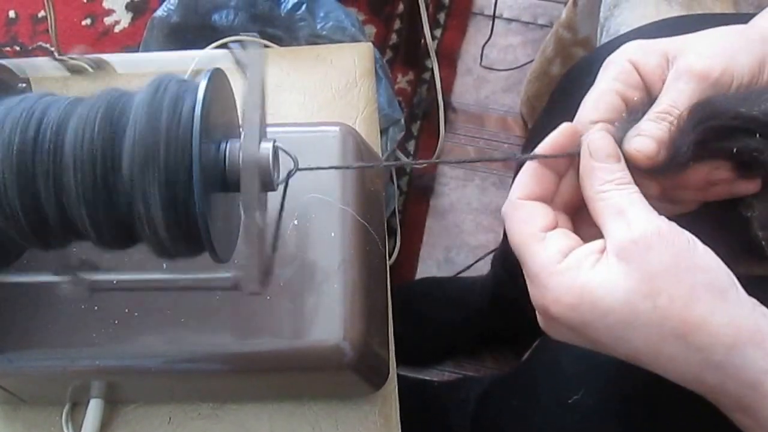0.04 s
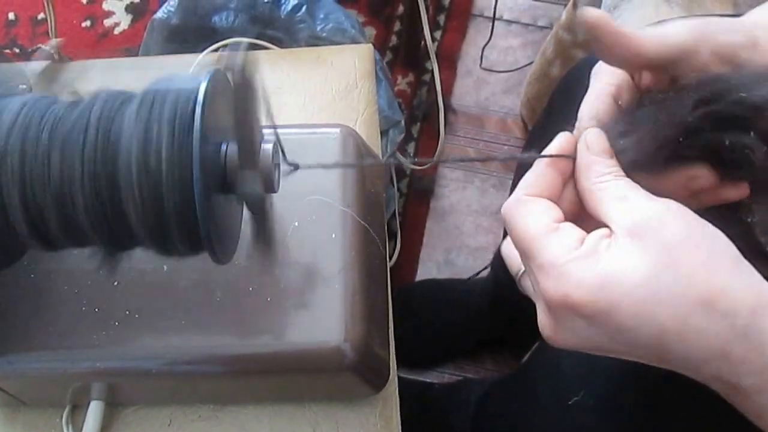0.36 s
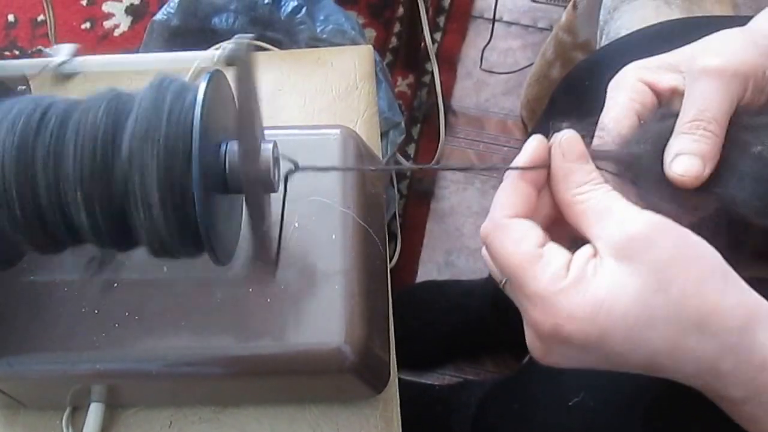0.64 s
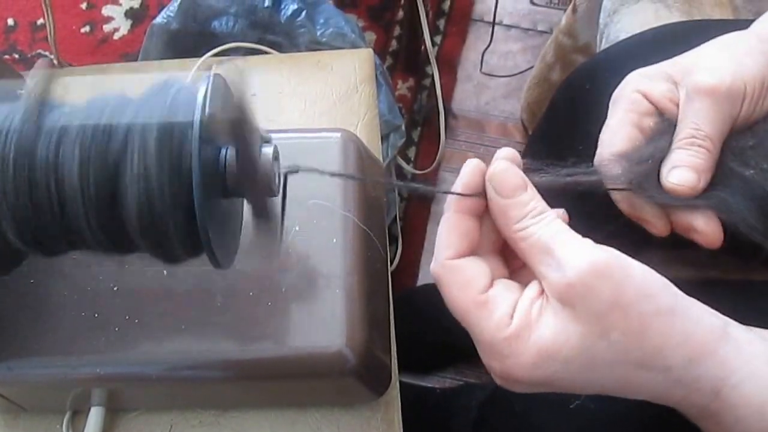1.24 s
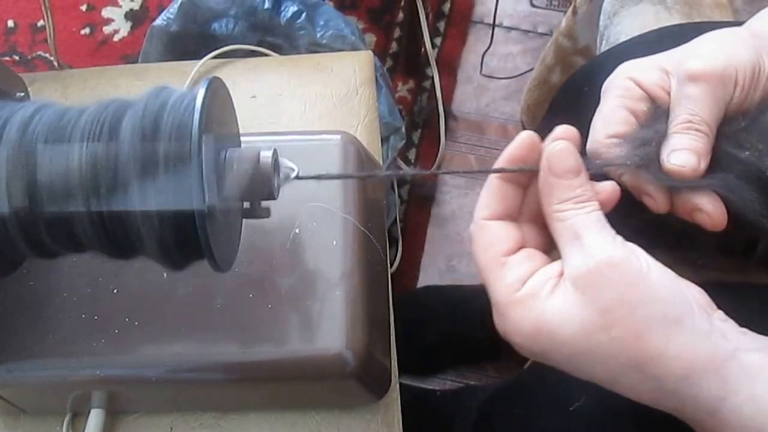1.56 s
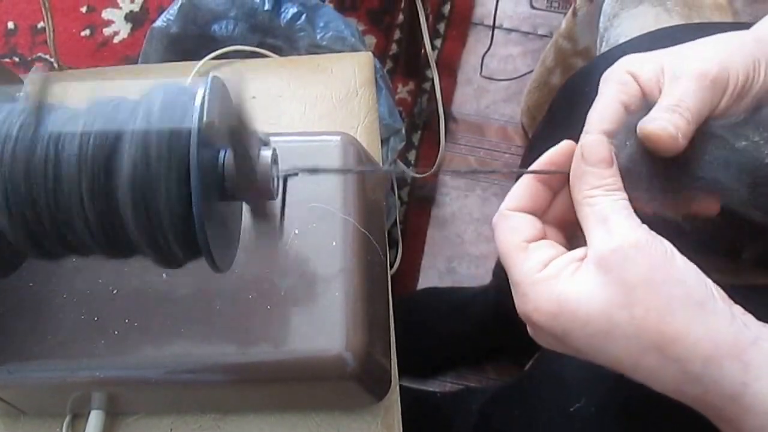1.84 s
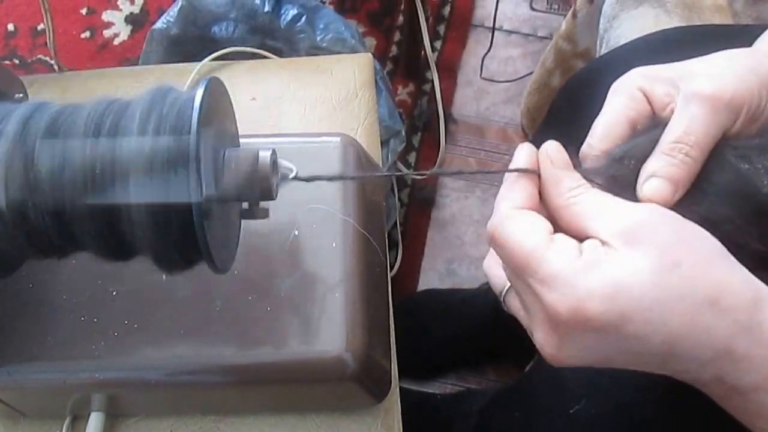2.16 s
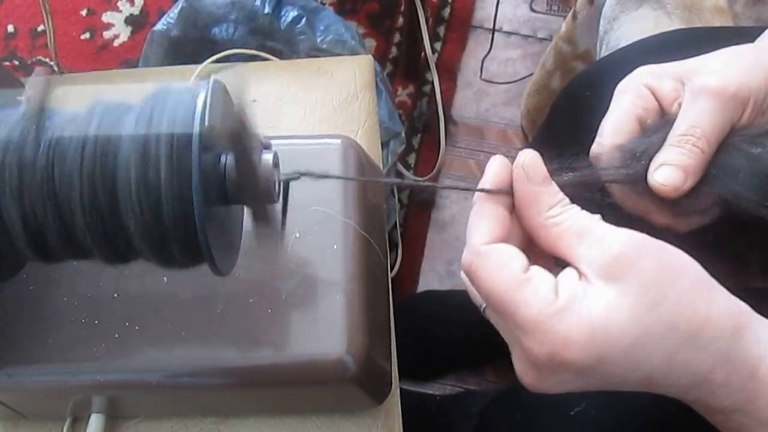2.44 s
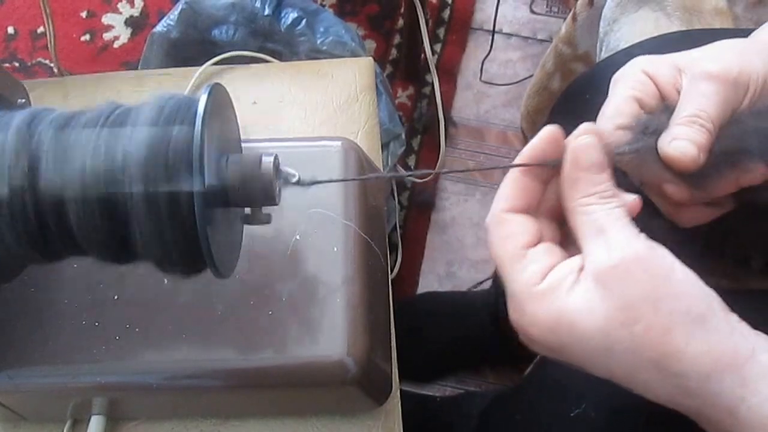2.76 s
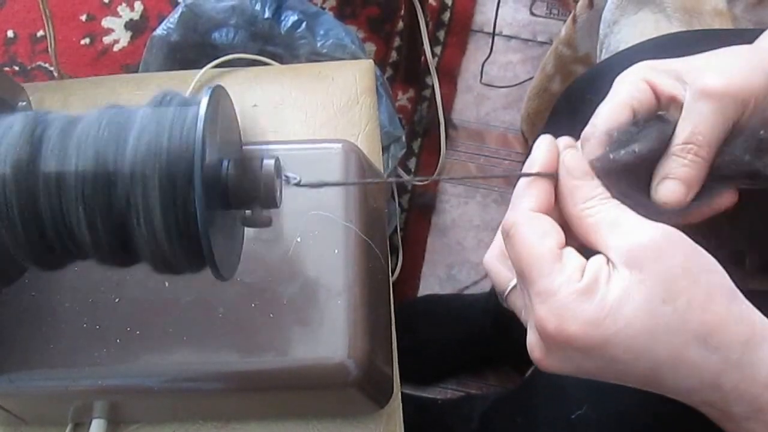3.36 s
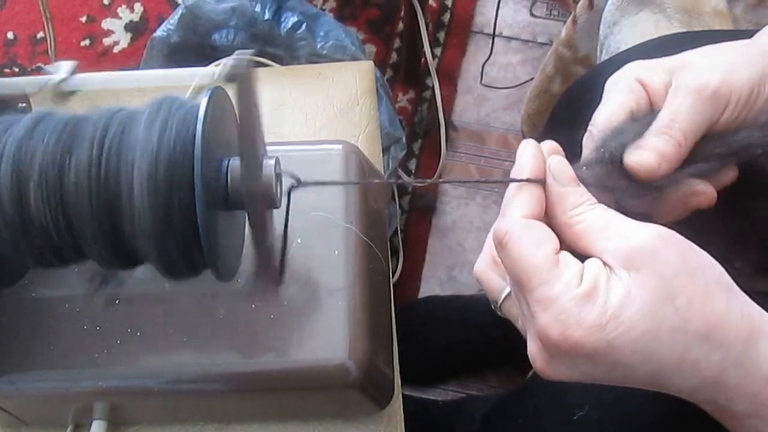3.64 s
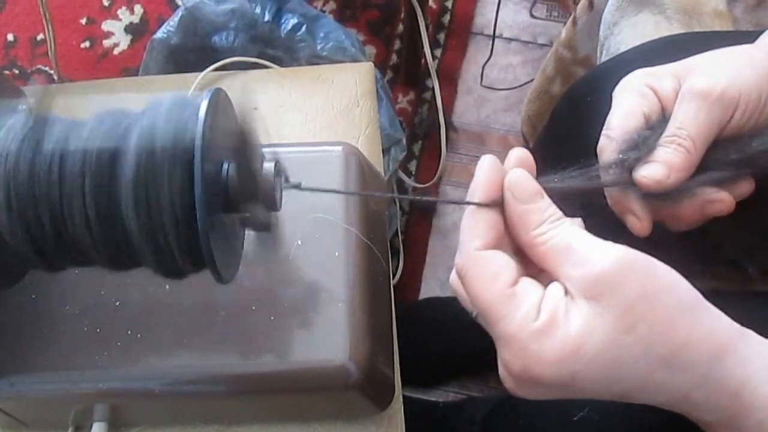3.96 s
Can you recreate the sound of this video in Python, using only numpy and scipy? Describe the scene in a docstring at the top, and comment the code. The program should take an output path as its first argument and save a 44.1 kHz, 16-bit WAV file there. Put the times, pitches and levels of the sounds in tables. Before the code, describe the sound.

An electric spinning wheel buzzes steadily with a fast throb and a fine metallic rattle. A few sharp ticks and soft bumps come early, then its belt scuffs in a light rhythm, heard close in a carpeted room.

```python
"""In a carpeted room, an electric spinning wheel runs on a table close by.
Its motor hums and knocks the casing once per cycle of the mains power, so the casing buzzes and the
metal parts rattle. The flyer (the spinning arms that twist the yarn) is off balance and presses harder
once per turn, so the buzz throbs. The belt's seam scuffs in runs of about five a second, sometimes
with a sharp tick. The frame bumps softly, and the yarn snaps once as it is drawn out."""
import sys
import numpy as np
from scipy import signal
from scipy.fft import rfft, irfft
from scipy.io import wavfile

SR = 44100
rng = np.random.default_rng(int(sys.argv[2]) if len(sys.argv) > 2 else 0)


def to_wav(sig):
    """Store sig (one row per channel, or 1-D mono) as 16-bit WAV at the path in sys.argv[1].

    Samples outside -1..1 are clipped; the rate is SR.
    """
    pcm = np.clip(np.atleast_2d(sig), -1, 1) * 32767
    pcm = np.round(pcm).astype(np.int16)
    wavfile.write(sys.argv[1], SR, pcm.T)  # frames by channels


N = 176400


def amp(db):
    """Turns decibels into a number to multiply a sound by."""
    return 10 ** (np.asarray(db) / 20)


def unit(x):
    """Scales a signal to an average (rms) level of 1."""
    return x / np.sqrt(np.mean(x ** 2) + 1e-20)


def add(mix, start_s, sound):
    """Mixes a sound in at the given time."""
    part = mix[max(round(start_s * SR), 0):][:len(sound)]
    part += sound[:len(part)]


def highpass(hz, order):
    """A filter that weakens everything below hz."""
    return signal.butter(order, hz, "high", fs=SR, output="sos")


def noise(points):
    """Noise whose tone follows a curve of (frequency [Hz], relative level [dB]) points."""
    point_hz, point_db = np.transpose(points)
    hz = np.fft.rfftfreq(N, 1 / SR)
    curve_db = np.interp(np.log(hz + 1), np.log(point_hz), point_db)
    return unit(irfft(rfft(rng.standard_normal(N)) * amp(curve_db), N))


def clicks(times, sizes):
    """One tiny click at each time, shared between the two nearest samples."""
    out = np.zeros(N)
    at = times * SR
    whole = np.floor(at).astype(int)
    out[whole % N] += sizes * (1 - at + whole)
    out[(whole + 1) % N] += sizes * (at - whole)
    return out


def bursts(times, force_db, rise_s, decay_s):
    """A loudness curve that swells at each knock and dies away."""
    t = np.arange(SR // 10) / SR
    shape = (1 - np.exp(-t / rise_s)) * np.exp(-t / decay_s)
    return unit(signal.fftconvolve(clicks(times, amp(force_db)), shape)[:N])


def struck_tone(times, sizes, hz, width):
    """A tone that rings after each strike; the greater its width in Hz, the sooner it fades."""
    t = np.arange(SR // 4) / SR
    ring = np.exp(-np.pi * width * t) * np.sin(2 * np.pi * hz * t)
    return signal.fftconvolve(clicks(times, sizes), ring)[:N]


def room_echo(sound, level_db=-22, fade_s=.25):
    """The short, weak echo of a carpeted room, falling 60 dB in fade_s."""
    t = np.arange(SR // 2) / SR
    tail = rng.standard_normal(len(t)) * np.exp(-np.log(1000) * t / fade_s) * (t > .005)
    return amp(level_db) * signal.fftconvolve(sound, tail / np.linalg.norm(tail))[:N]


def motor(whir_db=-43):
    """The motor hums steadily over the whir of bearings and air."""
    # tones of the hum and a faint whine: (frequency [Hz], rms level [dB])
    hum_tones = [(50, -59.5), (100, -69), (150, -65), (250, -57), (300, -58), (7881, -81), (13717, -86)]
    # tone of the whir: (frequency [Hz], relative level [dB])
    whir_curve = [(25, -11), (70, -8), (150, -4.5), (280, -4), (500, -1), (1400, -1), (1900, -9),
                  (2700, -10), (3300, -9), (3650, -2), (4000, -12), (4900, -20.5), (5500, -18), (5800, -23),
                  (6250, -17), (7100, -28), (8500, -30), (10500, -36), (15500, -40.5)]
    t = np.arange(N) / SR
    hum = sum(amp(db) * np.sqrt(2) * np.sin(2 * np.pi * (hz * t + rng.random())) for hz, db in hum_tones)
    return hum + amp(whir_db) * noise(whir_curve)


def frame_bumps(decay_s=.006):
    """Each soft bump of the frame is a low tone that dies almost at once."""
    # bumps: (time [s], frequency [Hz], level [dB])
    bumps = [(.835, 290, -35), (.982, 45, -35), (.986, 100, -38), (.986, 170, -37), (1.048, 285, -37),
             (3.17, 260, -42)]
    t = np.arange(SR // 10) / SR
    shape = 2 * t / decay_s * np.exp(-t / decay_s)
    out = np.zeros(N)
    for start_s, hz, db in bumps:
        add(out, start_s, amp(db) * shape * np.sin(2 * np.pi * hz * t))
    return out


def sharp_ticks(decay_s=.0009):
    """A few sharp ticks, mostly the belt's seam passing, plus one louder snap of the yarn."""
    # ticks: (time [s], level [dB])
    ticks = [(.2154, -30), (.9872, -24), (1.3815, -28), (1.579, -28), (3.5937, -34)]
    # tone of a tick: (frequency [Hz], relative level [dB])
    tick_curve = [(100, -8), (1000, 0), (2200, 0), (4500, -4), (6300, -11), (8000, -25), (11000, -32),
                  (16000, -46)]
    t = np.arange(SR // 10) / SR
    shape = t / decay_s * np.exp(1 - t / decay_s)
    loudness = np.zeros(N)
    for start_s, db in ticks:
        add(loudness, start_s, amp(db) * shape)
    return loudness * noise(tick_curve)


def belt_scuffs(length_s=.022):
    """The drive belt's seam rubs as it passes, making short puffs of noise."""
    # scuffs: (time [s], level [dB])
    scuffs = [(.209, -29), (.42, -41), (1.378, -38), (1.578, -32), (1.772, -34), (1.972, -33), (2.36, -41),
              (2.582, -33), (2.78, -37), (2.968, -34), (3.165, -35), (3.37, -40), (3.59, -37), (3.765, -38)]
    # tone of a scuff: (frequency [Hz], relative level [dB])
    scuff_curve = [(100, -25), (700, -8), (1500, 0), (1900, -2), (2600, -9), (3600, -9), (5000, -22),
                   (7000, -32), (12000, -58)]
    t = np.arange(SR // 10) / SR
    shape = np.sin(np.pi * np.minimum(t / length_s, 1) ** .5) ** 2
    loudness = np.zeros(N)
    for start_s, db in scuffs:
        add(loudness, start_s, amp(db) * shape)
    return loudness * noise(scuff_curve)


def motor_knocks(mains_hz=49.991, throb_db=2.9, uneven_db=.8):
    """Times and forces of the knocks: one per mains cycle, harder and softer as the flyer turns."""
    # how fast the flyer spins: (time [s], speed [turns per second])
    flyer_speeds = [(0, 13.74), (.3, 13.85), (.55, 12.64), (.9, 13.5), (1.4, 14.13), (2, 14.47),
                    (2.7, 14.95), (3.3, 14.74), (4, 15.16)]
    speed_db_per_hz = .5  # a faster flyer makes harder knocks
    early_s_per_db, jitter_s = 2e-5, 3e-5  # a harder knock lands sooner
    times = np.arange(.003305, N / SR, 1 / mains_hz)
    t = np.arange(N) / SR
    speed = np.interp(t, *np.transpose(flyer_speeds))
    turns = .2 + np.cumsum(speed) / SR
    sway_db = throb_db * np.cos(2 * np.pi * turns) + speed_db_per_hz * (speed - speed.mean())
    uneven, jitter = rng.standard_normal((len(times), 2)).T
    force_db = np.interp(times, t, sway_db) + uneven_db * uneven
    return times - early_s_per_db * force_db + jitter_s * jitter, force_db


def metal_rattle(times, force_db, rattle_db=-45.5, throb_share=.45, uneven_db=.9, rise_s=.003):
    """Each knock shakes a gritty rattle out of the metal parts and rings the flyer's arms."""
    # tone of the rattling parts: (frequency [Hz], relative level [dB])
    rattle_curve = [(800, -20), (1600, -7), (2000, -8), (2165, 2), (2330, -8), (2850, -7), (3030, -2),
                    (3300, -7), (3610, 0), (3950, -10), (4220, -9), (4450, -17), (4680, -14), (5000, -22),
                    (5420, -15), (5750, -23), (6250, -14), (6700, -19), (7200, -32), (8400, -34),
                    (10000, -50), (15000, -70)]
    # ringing tones of the arms: (frequency [Hz], width [Hz], level [dB])
    arm_tones = [(2164, 14, -49), (3030, 60, -53), (3610, 45, -48.5)]
    shake_db = throb_share * force_db + uneven_db * rng.standard_normal(len(times))
    out = amp(rattle_db) * noise(rattle_curve) * bursts(times, shake_db, rise_s, decay_s=.0042)
    for hz, width, db in arm_tones:
        delays = rise_s * rng.random(len(times))
        out += struck_tone(times + delays, amp(db + force_db), hz, width)
    return out


def casing_buzz(times, force_db, ring_db=.4, chatter_db=-36.5, scatter_db=.5):
    """Each knock makes the casing ring and chatter loosely; the quick knocks blend into a buzz."""
    # ringing tones of the casing: (frequency [Hz], width [Hz], relative level [dB])
    casing_tones = [(364, 10, -31.5), (433, 38, -14.1), (444, 10, -28.8), (479, 22, -29.5), (541, 16, -29),
                    (655, 20, -33.5), (688, 29, -26.9), (791, 16, -27.5), (828, 10, -31.5),
                    (910, 71, -19.3), (857, 260, -17.2), (1078, 48, -25.5), (1172, 19, -36),
                    (1280, 16, -47), (1500, 136, -39)]
    # which way each tone swings first: (direction [+1 or -1])
    directions = [-1, 1, -1, -1, -1, -1, -1, -1, -1, -1, 1, -1, 1, 1, 1]
    # tone of the chatter: (frequency [Hz], relative level [dB])
    chatter_curve = [(100, -50), (315, -34), (365, -5), (440, -1), (490, -10), (590, -10), (650, -3),
                     (730, -6), (825, 1), (870, -16), (930, -4), (1010, -9), (1140, -1), (1230, -11),
                     (1500, -12), (1800, -22), (3000, -50)]
    ring = np.zeros(N)
    for (hz, width, db), direction in zip(casing_tones, directions):
        strike_db = force_db * (hz / 600) ** .75  # harder knocks sound brighter
        sizes = amp(db + strike_db + scatter_db * rng.standard_normal(len(times)))
        ring += struck_tone(times, direction * sizes, hz, width)
    ring = signal.sosfilt(highpass(270, order=4), ring)  # the casing is too small to give off bass
    ring = signal.lfilter(*signal.iirnotch(598, Q=14, fs=SR), ring)  # a pitch where it barely moves
    chatter = noise(chatter_curve) * bursts(times, force_db, rise_s=.0025, decay_s=.006)
    buzz = amp(ring_db) * ring + amp(chatter_db) * chatter
    return signal.sosfiltfilt(highpass(300, order=8), buzz)


def scene():
    """The running wheel, its echo and the motor's hum, in one channel."""
    times, force_db = motor_knocks()
    wheel = casing_buzz(times, force_db) + metal_rattle(times, force_db)
    wheel += belt_scuffs() + sharp_ticks() + frame_bumps()
    return (wheel + room_echo(wheel) + motor())[None]


def record(dry, cutoff_hz=15850):
    """Takes away the very highest treble."""
    lowpass = signal.firwin(511, cutoff_hz, window=("kaiser", 9), fs=SR)
    return signal.oaconvolve(dry, lowpass[None], "same")


dry = scene()
out = record(dry)
to_wav(out)
```